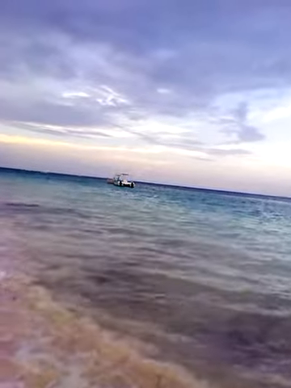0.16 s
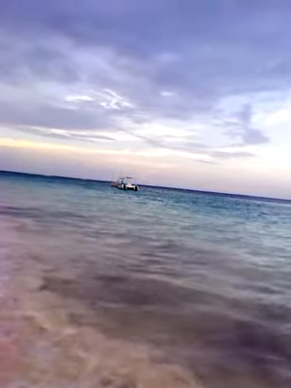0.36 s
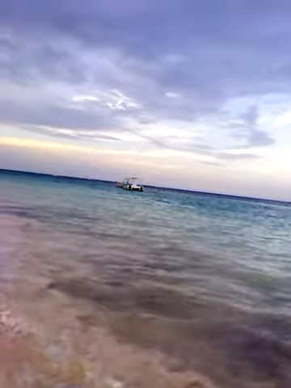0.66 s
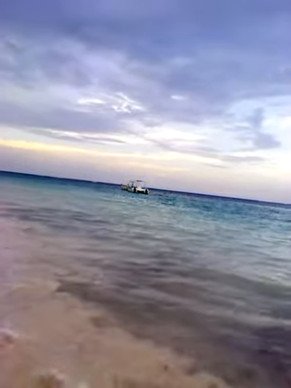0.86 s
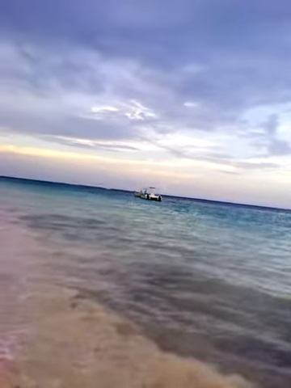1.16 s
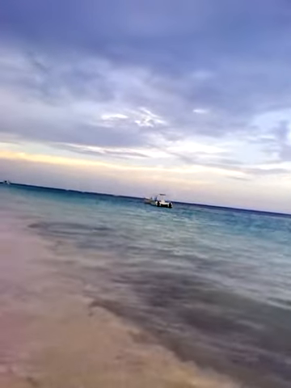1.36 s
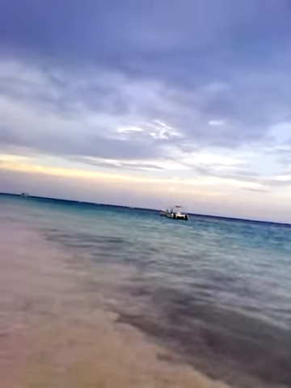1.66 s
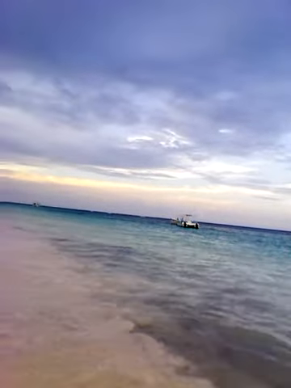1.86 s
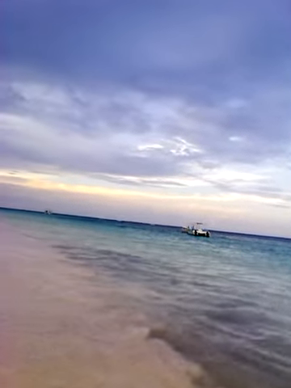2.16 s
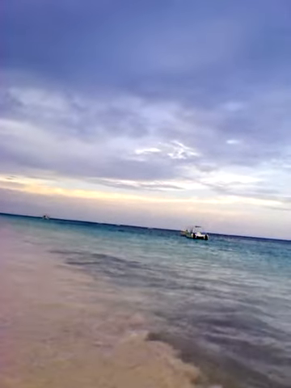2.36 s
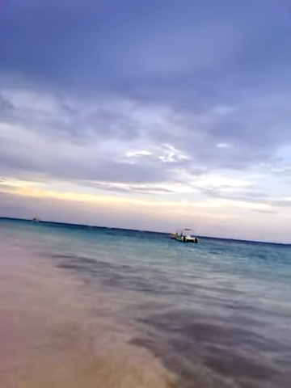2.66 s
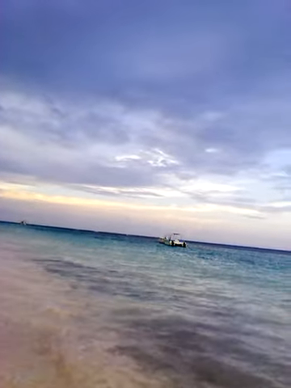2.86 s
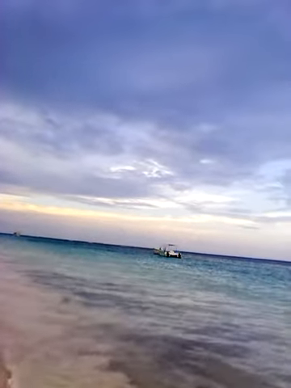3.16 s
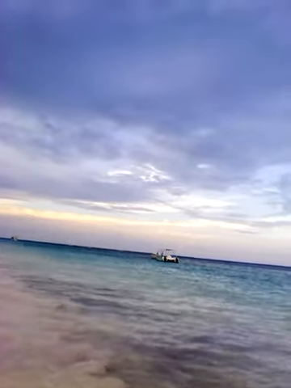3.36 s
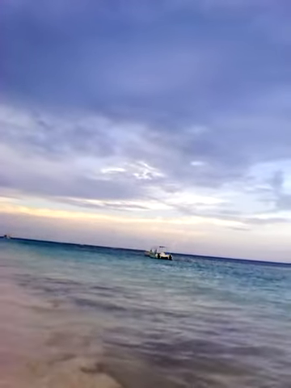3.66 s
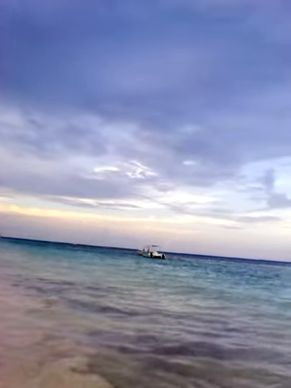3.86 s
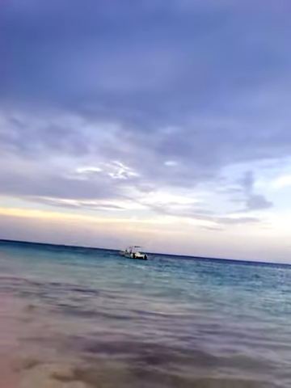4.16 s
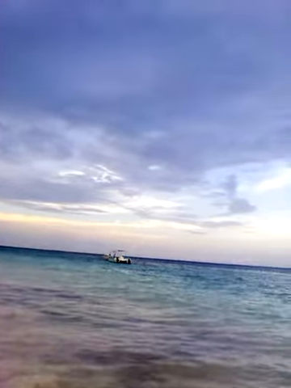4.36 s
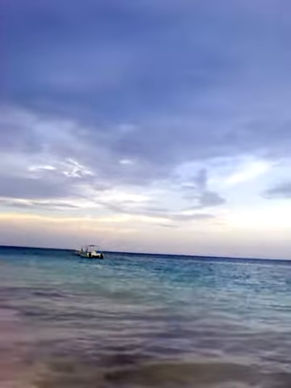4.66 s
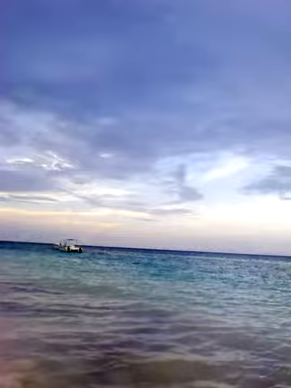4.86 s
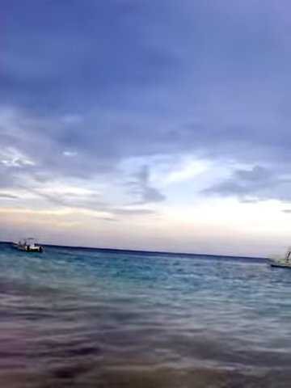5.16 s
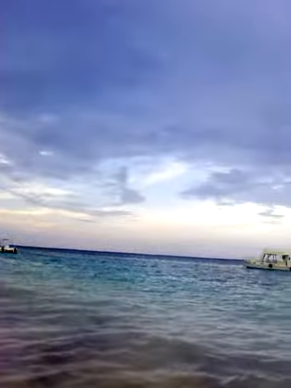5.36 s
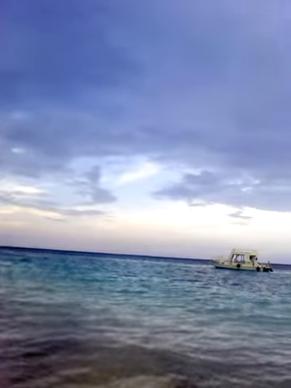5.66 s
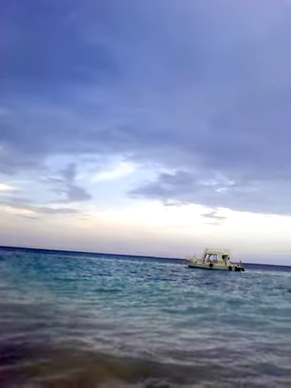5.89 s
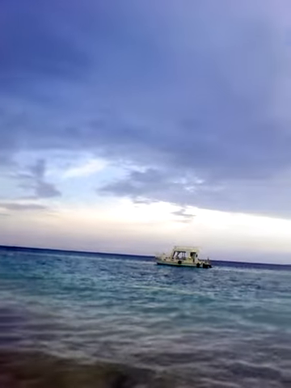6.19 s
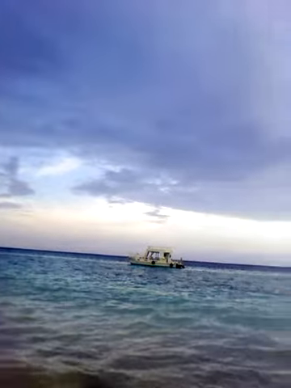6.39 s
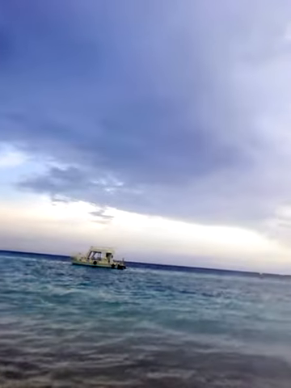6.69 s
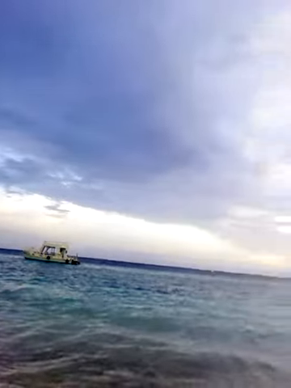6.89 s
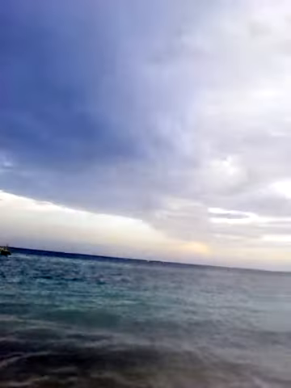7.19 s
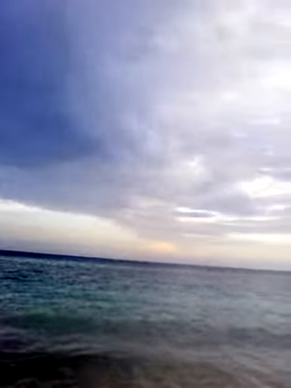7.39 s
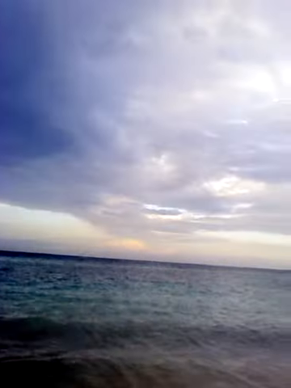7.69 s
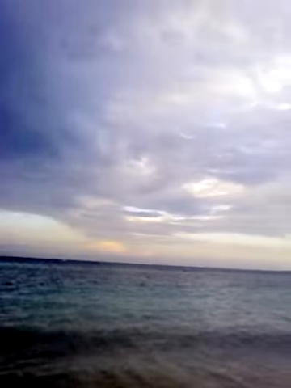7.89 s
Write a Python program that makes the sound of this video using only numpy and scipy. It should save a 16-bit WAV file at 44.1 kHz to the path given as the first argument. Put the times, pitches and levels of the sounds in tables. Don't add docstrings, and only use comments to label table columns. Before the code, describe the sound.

Foamy surf swells and hisses back over sand, fades under a hard buffeting gust, then returns as water slaps and soft wind puffs continue.

```python
import sys
import numpy as np
from scipy import signal
from scipy.fft import rfft, irfft, next_fast_len
from scipy.io import wavfile
from scipy.ndimage import uniform_filter1d

SR = 44100
rng = np.random.default_rng(int(sys.argv[2]) if len(sys.argv) > 2 else 0)


def magnitude_from_level(level_db):
    exponent = np.asarray(level_db, float) / 20
    return 10 ** exponent


def materialize(psi):
    bounded = np.clip(np.atleast_2d(psi).T, -1, 1)
    quanta = np.round(bounded * 32767).astype(np.int16)
    wavfile.write(sys.argv[1], SR, quanta)


N = 354563

# f/Hz, level/dB
WHINE = [(9367, -64.5)]
# f/Hz, level/dB
BUZZ = [(9300, -63), (12000, -58.5), (14900, -61)]
# t/s, level/dB, length/ms
PARTINGS = [
    (.475, -54, 35),
    (2.52, -32, 28),
    (3.545, -55, 35),
    (7.84, -28, 28),
]
# t/s, foam vigour/dB, big-bubble heft/dB, backwash pull/dB
SWASH = [(0, -33, 0, 0.5), (.65, -32.5, 1, -0.5), (1.4, -29, -1, 1), (1.8, -26.5, -1.5, 0),
         (2.05, -26, -2, -0.5), (2.3, -22, -4, -5), (2.6, -22, -0.5, -3), (2.87, -21.5, 2, 3),
         (3.3, -30.5, 2, 3.5), (3.8, -35, 4, 2.5), (4.25, -36.5, 2.5, 0), (4.6, -41, 0, -1.5),
         (5.3, -46.5, 1, 0.5), (5.95, -47.5, 4, 3), (6.02, -39.5, -0.5, 4), (6.4, -30.5, -1, 0.5),
         (7.2, -30, 0, 1), (8.04, -28, 0, -0.5)]
# t/s, lift/dB, length/ms
SPLASHES = [(.04, 5, 26), (.51, 3.5, 160), (1.07, 4, 110), (1.57, 3, 130), (1.72, 2, 50), (1.84, 3.5, 180),
            (2.44, 0, 77), (3.36, 8, 29), (3.83, 2, 50), (5.24, 1, 30), (5.92, 4, 60), (6.04, 2.5, 40),
            (6.115, 3, 30), (7.75, -1, 140), (.3, 2, 150), (6.22, 0, 60), (6.35, 2, 50), (7.1, 3.5, 130),
            (7.35, 2, 120)]
# t/s, change/dB, length/ms
CLOUDS = [
    (.7, -0.5, 150),
    (2.78, 0.5, 50),
    (4.05, 0, 220),
    (4.75, 0, 250),
    (6.1, -1.5, 200),
    (6.9, -1.5, 100),
]
# f/Hz, density/dB
ROAR_SPECTRUM = [(150, -19), (300, -3), (600, -2), (1200, -3.5), (1900, -8), (2600, -13), (4000, -23.5)]
WASH_SPECTRUM = [(1500, -16), (2300, 0), (3200, 2), (4200, 0), (5200, -15.5), (7000, -49.5)]
FIZZ_SPECTRUM = [(3500, -21), (4600, -2.5), (6000, 4), (7500, -3), (9000, -10.5), (11000, -17.5)]
SPRAY_SPECTRUM = [(7000, -4.5), (9000, -4), (11000, -7), (12300, -7.5), (13400, -12), (14400, -9),
                  (15500, -10), (17000, -2)]
# t/s, peak/dB
DROPS = [(0.8865, -27), (1.2077, -22), (1.2731, -25), (1.3943, -16), (1.7929, -21), (1.8348, -19),
         (2.1486, -20), (2.2254, -16), (2.5302, -19), (2.7677, -18), (2.8295, -21), (2.9308, -19),
         (3.2256, -24), (3.3504, -18), (3.6113, -28), (3.6616, -22), (3.957, -25), (6.025, -31),
         (6.3295, -19), (6.408, -23), (6.5576, -27), (6.6963, -24), (6.8335, -24), (6.8539, -20),
         (7.5309, -23)]
# t/s, level/dB, f/Hz, length/ms
SLAPS = [(6.647, -21, 950, 12), (6.683, -26, 960, 14), (2.918, -21, 1560, 16), (2.974, -22, 1350, 14),
         (3.236, -24, 1540, 16), (2.47, -24, 1050, 20), (2.87, -25, 1300, 20), (3.05, -25, 1300, 20),
         (7.3, -34, 880, 30), (3.759, -25, 820, 15), (6.778, -28, 710, 22), (2.9, -28, 1380, 200),
         (2.93, -27.5, 1800, 210)]
# t/s, level/dB, f/Hz, length/ms
GURGLES = [(5.42, -46, 3600, 180), (5.56, -47, 3400, 150), (6.04, -37, 850, 25), (5.91, -39, 5800, 10),
           (5.93, -39, 5800, 10), (5.96, -42, 5700, 10), (5.997, -40, 6000, 10), (6.73, -33, 800, 140),
           (3.375, -30, 5900, 40), (6.11, -36.5, 1300, 80), (3.15, -30, 1800, 220), (4.05, -42, 1900, 200),
           (2.68, -32, 1200, 120)]
# t/s, level/dB
BREEZE = [(0, -35), (.36, -36), (.55, -26), (.87, -38), (1.2, -29), (1.75, -31), (2.15, -39), (2.33, -37),
          (2.9, -32), (3.27, -43.5), (3.74, -32.5), (4.28, -31), (4.7, -21.5), (5.25, -28), (5.53, -32),
          (6.74, -28), (7.3, -31), (8.04, -26)]
# t/s, change/dB, length/ms
LULLS = [(.36, -6, 60), (.41, -8, 25), (.575, -8, 12), (.593, -8, 12), (.68, -5, 20), (4.43, -5, 15),
         (4.53, -5, 12), (4.742, -5, 15), (5.325, -4, 25), (6.03, -5, 40), (5.72, -6, 30), (.765, -13, 40),
         (.86, -6, 50), (1.3, -5, 70), (2.16, -9, 110), (2.65, -4, 100), (3.0, -4, 80), (3.28, -3, 100),
         (4.41, -10, 45), (4.6, -4, 20), (4.725, 1, 40), (4.895, 2, 40), (4.995, 3, 30), (5.055, 1.5, 40),
         (5.955, -4, 22), (6.2, -7, 50), (6.45, -3, 200), (6.85, -1, 140), (7.81, -10, 36)]
# t/s, peak/dB, length/ms
SWELLS = [(0, -29, 44), (.15, -37, 80), (.43, -26, 66), (.57, -36, 100), (.96, -25, 81), (1.19, -35, 81),
          (1.43, -36, 83), (1.75, -39, 200), (2.33, -38, 68), (3.74, -39, 150), (4.28, -39, 270),
          (4.47, -26, 120), (5.19, -26.5, 270), (5.4, -36, 100), (5.8, -44, 110), (3.12, -42, 120),
          (3.5, -39, 140), (7.23, -33, 160), (7.66, -35, 260), (7.95, -36, 150)]
# f/Hz, density/dB
EDDY_SPECTRUM = [(60, -30), (100, -3.5), (140, 4), (270, -2.5), (520, -13.5), (820, -35), (1300, -39),
                 (2500, -66)]
DEEP_SPECTRUM = [(15, -24), (30, -15), (50, -4), (80, -1.5), (110, -0.5), (160, -25)]
# t/s, f/Hz, level/dB
SHEDDING = [(5.4, 120, -30), (5.55, 119.8, -34.5), (5.82, 133.9, -25), (5.91, 132.8, -29.5),
            (5.97, 119, -33), (6.03, 121, -33), (6.07, 134, -33.5), (6.16, 139, -34.5), (6.3, 129.6, -33),
            (6.56, 133.5, -31), (6.72, 111.4, -30.5), (7.0, 105.5, -36)]
# t/s, change/dB
THROBS = [(5.4, 10), (5.63, 7), (5.765, 10), (5.924, 16), (6.03, -7), (6.08, 10), (6.15, 10), (6.2, -7),
          (6.26, 8), (6.31, 4), (5.49, 3), (5.67, 5), (5.705, -10), (5.83, 2), (5.985, 7), (6.116, -6),
          (6.46, 7), (6.485, -6), (6.535, 10), (6.61, -10), (6.67, -3), (6.74, 2), (6.8, 1.5), (6.88, -5),
          (6.914, 12.5)]
# t/s, peak/dB, f/Hz, length/ms
STRAYS = [(4.415, -22, 200, 12), (5.435, -19.5, 170, 18), (.44, -16.5, 330, 8), (.477, -17.5, 320, 10),
          (.862, -25.5, 480, 14), (.225, -25.5, 150, 20), (.72, -23, 110, 30), (.8, -22, 150, 20),
          (1.19, -23, 330, 25), (1.55, -29, 220, 30), (2.06, -25.5, 170, 28), (2.25, -30, 210, 50),
          (2.55, -32, 150, 40), (2.99, -30, 150, 27), (3.56, -26.5, 150, 35), (3.86, -29.5, 150, 55),
          (5.1, -22, 250, 14), (5.42, -27, 230, 36), (5.59, -28, 350, 14), (5.8, -25, 239, 60),
          (6.09, -23, 210, 26), (6.44, -26.5, 220, 72), (7.43, -24, 130, 25.6), (7.5, -23, 110, 30),
          (7.77, -25, 140, 40)]
# t/s, peak/dB, f/Hz
FLUTTERS = [(.03, -29, 213), (1.344, -23, 234), (1.594, -23, 251), (1.707, -24, 295), (1.741, -23.5, 199),
            (1.859, -22.5, 354), (3.519, -21, 212), (3.637, -20.5, 175), (3.68, -24, 330),
            (3.812, -25, 241), (4.02, -20.5, 253), (4.04, -25, 253), (4.089, -23, 220), (4.294, -20.5, 180),
            (4.34, -20.5, 241), (5.558, -23.5, 174), (5.599, -20, 198), (5.79, -27, 276), (6.311, -21, 171),
            (6.595, -24, 344.6), (6.625, -26, 320), (5.985, -25.5, 220), (7.059, -22, 205),
            (7.083, -23.5, 242), (7.175, -22, 217), (7.296, -23, 180), (7.544, -21, 264), (7.678, -20, 212),
            (7.749, -22, 198), (7.852, -28, 183), (7.924, -25, 240)]
# t/s, peak/dB, f/Hz, length/ms
PUFFS = [(0.0, -15, 122, 8.2), (0.119, -19, 232, 39), (0.296, -20.5, 236, 25), (.43, -16, 147, 19),
         (0.465, -12.5, 136, 9.6), (0.603, -21, 145, 12), (0.819, -18.5, 187, 9.2), (.908, -15, 188, 16),
         (1.046, -19, 232, 18), (1.219, -20.5, 233, 45), (1.426, -14, 251, 15), (1.648, -18.5, 248, 34),
         (1.803, -20.5, 200, 18), (1.955, -19.5, 213, 14), (3.356, -17, 205, 9.5), (3.716, -15.5, 270, 16),
         (3.981, -21, 203, 13), (4.176, -18, 222, 19), (4.266, -15, 214, 9.8), (4.379, -17, 238, 27),
         (5.398, -16, 130, 30), (5.671, -18.5, 180, 14), (5.93, -24.5, 300, 26), (6.118, -19.5, 245, 12),
         (7.223, -13, 262, 21), (7.34, -16, 241, 13), (7.387, -18, 209, 19), (7.643, -19.5, 255, 62),
         (7.997, -21.5, 220, 31), (8.033, -18, 280, 22)]
# t/s, peak/dB, f/Hz, length/ms
GUSTS = [(.524, -13, 210, 22), (.5375, -1.5, 230, 6.4), (.552, -6, 260, 13.5), (.5635, 3.5, 212, 11.3),
         (.584, -16, 250, 6.6), (.602, -18, 170, 10), (.616, -19, 300, 8), (.948, -18.5, 300, 10),
         (.983, -14.5, 300, 8), (4.725, -20, 258, 18), (4.778, -9, 298, 7.4), (4.888, -15, 180, 14),
         (4.906, -20, 220, 11), (4.947, -15, 180, 14), (4.992, -15, 230, 12), (5.045, -18, 160, 16),
         (5.063, -18, 200, 14), (5.1, -19, 300, 11), (5.18, -14, 180, 10), (5.208, -12, 160, 11),
         (5.268, -17, 190, 7.9), (5.367, -17, 180, 12), (.654, -13.5, 176, 24), (.7, -11, 255, 15),
         (.974, -14, 284, 26), (4.455, -15, 131, 24), (4.487, -15, 160, 54), (4.543, -10, 192, 16),
         (4.576, -15, 224, 20), (4.62, -16.5, 202, 20), (4.654, -9.5, 255, 16), (4.703, -14, 158, 23),
         (4.77, -6.5, 214, 25), (4.8, -16.5, 240, 27), (4.824, -10.5, 235, 9.6), (4.87, -15, 207, 32),
         (4.93, -13.5, 184, 35), (4.965, -16.5, 179, 24), (5.022, -10, 140, 13), (5.081, -18, 160, 10),
         (5.131, -12, 143, 11), (5.156, -11, 183, 25), (5.166, -7, 188, 19), (5.193, -4, 214, 15),
         (5.227, -8, 220, 6), (5.252, -2.5, 208, 12.5), (5.285, -7.5, 242, 9.3), (5.302, -8, 206, 14),
         (5.347, -14, 136, 13)]
# t/s, peak/dB
SNAPS = [(.534, -19), (.551, -12), (.564, -7), (.702, -14.5), (.971, -10), (1.195, -16.5), (3.714, -12.5),
         (4.016, -18), (4.503, -19), (4.545, -17.5), (4.655, -17.5), (4.776, -16), (4.827, -13),
         (5.162, -12), (5.238, -9), (5.252, -20), (5.283, -20), (5.292, -19), (5.302, -14.5),
         (5.384, -17.5), (7.224, -19), (8.003, -15)]
# t/s, peak/dB, f/Hz
CRACKS = [(5.197, -7.5, 940), (5.1975, -22, 1600), (5.206, -19, 640), (4.827, -24.5, 940),
          (5.598, -33, 800), (5.2381, -26, 3200), (5.238, -17, 2000), (5.2525, -30, 2400), (.566, -17, 950),
          (.559, -16, 910), (.923, -17, 630), (5.014, -24, 550), (5.667, -21, 500), (4.704, -18, 650),
          (4.547, -19, 650), (4.7745, -19, 900), (5.2535, -16, 850), (5.284, -21, 1000), (4.578, -22, 600),
          (4.992, -23, 700), (.984, -20, 800), (2.5, -28, 910)]

PORT_HZ, PORT_WIDTH_HZ, PORT_DB = 5900, 1970, 7
USUAL_VIGOUR_DB, USUAL_BREEZE_DB = -31, -32


def rms_one(x):
    return x / np.sqrt(np.mean(x ** 2) + 1e-20)


def in_time(rows):
    s, *columns = np.transpose(rows)
    return [np.interp(np.arange(N) / SR, s, c) for c in columns]


def drift(rate_hz):
    r = np.exp(-80 * np.pi * rate_hz / SR)
    slow = signal.lfilter([1], [1, -2 * r, r * r], rng.standard_normal(N // 40 + 2002))[2000:]
    return np.interp(np.arange(N) / 40, np.arange(len(slow)), rms_one(slow))


def add(out, sound, s):
    at = round(s * SR) - len(sound) // 2
    low, high = max(at, 0), min(at + len(sound), N)
    out[low:high] += sound[low - at:high - at]


def bells(rows):
    out, t = np.zeros(N), np.arange(-12000, 12000) / SR
    for s, height, ms in rows:
        add(out, height * np.exp(-.5 * (t / (0.33 * ms / 1000)) ** 2), s)
    return out


def sos_filter(order, hz, kind, x):
    return signal.sosfilt(signal.butter(order, hz, kind, fs=SR, output="sos"), x)


def port(x):
    r = np.exp(-np.pi * PORT_WIDTH_HZ / SR)
    poles = [1, -2 * r * np.cos(2 * np.pi * PORT_HZ / SR), r * r]
    peak = signal.lfilter([(1 - r * r) / 2, 0, (r * r - 1) / 2], poles, x)
    return x + (magnitude_from_level(PORT_DB) - 1) * peak


def patchy(source, spectrum, shared_db, own_db, rate_hz):
    size = next_fast_len(N)
    log_hz = np.log(np.maximum(np.arange(size // 2 + 1) * SR / size, 1))
    points = np.array(spectrum)
    knots = np.log(points[:, 0])
    coloured = rfft(source, size) * magnitude_from_level(np.interp(log_hz, knots, points[:, 1]))
    step = np.log(2) / 2
    out, together = 0, drift(rate_hz)
    for centre in np.arange(knots[0], knots[-1] + step, step):
        share = np.cos(np.pi / 2 * np.clip((log_hz - centre) / step, -1, 1)) ** 2
        flicker_db = shared_db * together + own_db * drift(rate_hz)
        out = out + irfft(coloured * share, size)[:N] * magnitude_from_level(flicker_db)
    return out


def burst(rows, below, above, high_order, low_order, cycles, peaky, swing=0):
    out, t = np.zeros(N), np.arange(-4500, 4500) / SR
    for (s, db, hz, ms), noise in zip(rows, rng.standard_normal((len(rows), len(t)))):
        plain = np.sqrt(2) * np.sin(2 * np.pi * (hz * t + noise[0]))
        noise = sos_filter(high_order, hz * below, "high", noise)
        noise = sos_filter(low_order, hz * above, "low", noise)
        noise = noise / np.sqrt(uniform_filter1d(noise ** 2, round(cycles * SR / hz)) + 1e-12)
        core = swing * np.exp(-.5 * (hz * t / 0.66) ** 2)
        noise = core * plain + np.sqrt(np.clip(1 - core ** 2, 0, 1)) * noise
        noise = noise * (np.abs(noise) + 0.44) ** peaky
        bell = np.exp(-.5 * (t / (0.34 * ms / 1000)) ** 2)
        add(out, magnitude_from_level(db - 3.5) * bell * noise, s)
    return out


def electronics():
    t = np.arange(N) / SR
    whine = sum(np.sqrt(2) * magnitude_from_level(db) * np.sin(2 * np.pi * hz * t) for hz, db in WHINE)
    buzz_per_s, first_s = 10.0, .085
    throb = (.5 + .5 * np.cos(2 * np.pi * buzz_per_s * (t - first_s))) ** 1.5
    white = rng.standard_normal(N)
    buzz = 0
    for hz, db in BUZZ:
        buzz = buzz + magnitude_from_level(db) * rms_one(sos_filter(2, [hz - 450, hz + 450], "band", white))
    return whine + throb * buzz


def parting():
    hiss = port(sos_filter(4, [5700., 9600.], "band", rng.standard_normal(N)))
    return rms_one(hiss) * bells([(s, magnitude_from_level(db - 7.0), ms) for s, db, ms in PARTINGS]) * [[1], [-1]]


def gurgles():
    return burst(GURGLES, below=.9, above=1.1, high_order=6, low_order=6, cycles=40., peaky=0)


def slaps():
    return burst(SLAPS, below=.95, above=1.05, high_order=8, low_order=8, cycles=20., peaky=0)


def drops():
    out, t = np.zeros(N), np.arange(-500, 500) / SR
    decay_s = 0.0023
    for (s, db), noise in zip(DROPS, rng.standard_normal((len(DROPS), len(t)))):
        add(out, magnitude_from_level(db - 5.5) * noise * (t >= 0) * np.exp(-np.abs(t) / decay_s), s)
    return port(sos_filter(1, [4000., 11000.], "band", out))


def bursting(per_s, spread_db, share):
    sizes_db = spread_db * np.minimum(rng.exponential(1, N), 3.6)
    sizes = magnitude_from_level(sizes_db) * rng.choice([-1, 1], N)
    born = rng.random(N) < per_s / SR
    return share * rms_one(sizes * born) + rng.standard_normal(N)


def surf():
    vigour_db, heft_db, pull_db = in_time(SWASH)
    heft_db = heft_db + bells(CLOUDS)
    splash_db = bells(SPLASHES)
    swing_db = vigour_db - USUAL_VIGOUR_DB
    bubbles = bursting(per_s=400., spread_db=3.5, share=0.53)
    foam = bursting(per_s=2500., spread_db=4.5, share=0.56)
    roar = patchy(bubbles, ROAR_SPECTRUM, shared_db=0.7, own_db=0.65, rate_hz=24.0)
    wash = patchy(foam, WASH_SPECTRUM, shared_db=1.07, own_db=1.23, rate_hz=30.0)
    fizz = patchy(foam, FIZZ_SPECTRUM, shared_db=0.5, own_db=1.02, rate_hz=63.0)
    spray = patchy(foam, SPRAY_SPECTRUM, shared_db=1.5, own_db=0.5, rate_hz=27.0)
    roar_db = -33.4 + swing_db + 0.93 * heft_db + 0.15 * splash_db
    wash_db = -39.5 + 0.98 * swing_db + 0.87 * pull_db + 0.7 * splash_db
    fizz_db = -32 + swing_db + 0.01 * heft_db + 0.54 * splash_db
    spray_db = -50 + swing_db + 0.05 * pull_db + 0.6 * splash_db
    out = magnitude_from_level(-50) * rms_one(port(spray))
    for db, layer in [(roar_db, roar), (wash_db, wash), (fizz_db, fizz), (spray_db, spray)]:
        out = out + magnitude_from_level(db) * rms_one(port(layer))
    return out


def shedding():
    hz, db = in_time(SHEDDING)
    t = np.arange(N) / SR
    fade_in = np.clip((t - SHEDDING[0][0]) / 0.037, 0, 1)
    fade_out = np.clip((SHEDDING[-1][0] - t) / 0.042, 0, 1)
    phase = 2 * np.pi * np.cumsum(hz * (1 + 0.045 * drift(18.2))) / SR
    throb_ms = 28
    throb_db = bells([(s, lift_db, throb_ms) for s, lift_db in THROBS])
    level = np.sqrt(2) * fade_in * fade_out * magnitude_from_level(db + throb_db + 1.5 * drift(16.0))
    return level * (np.sin(phase) + 0.1 * np.sin(2 * phase))


def steady_wind():
    breeze_db, = in_time(BREEZE)
    wake_db, wake_ms = -20, 50
    wake_power = bells([(s, magnitude_from_level(db + wake_db) ** 2, wake_ms) for s, db, hz, ms in GUSTS + PUFFS])
    swell_power = bells([(s, magnitude_from_level(db) ** 2, ms) for s, db, ms in SWELLS])
    deep_db = -45.5 + 0.61 * (breeze_db - USUAL_BREEZE_DB)
    rumble = patchy(rng.standard_normal(N), EDDY_SPECTRUM, shared_db=3.0, own_db=1.0, rate_hz=36.0)
    deep = patchy(rng.standard_normal(N), DEEP_SPECTRUM, shared_db=2.5, own_db=1.5, rate_hz=9.1)
    rumble = np.sqrt(magnitude_from_level(breeze_db - 2.0) ** 2 + wake_power) * rms_one(rumble)
    deep = np.sqrt(magnitude_from_level(deep_db) ** 2 + swell_power) * rms_one(deep)
    return magnitude_from_level(bells(LULLS)) * (rumble + deep)


def strays():
    return burst(STRAYS, below=0.57, above=1.3, high_order=2, low_order=4, cycles=2.24,
                 peaky=0.28, swing=0.75)


def puffs():
    flutter_ms = 19.5
    rows = GUSTS + PUFFS + [row + (flutter_ms,) for row in FLUTTERS]
    pressure = burst(rows, below=0.49, above=1.38, high_order=2, low_order=4, cycles=2.24,
                     peaky=0.4, swing=0.88)
    return sos_filter(2, 85., "high", pressure)


def snapped(flow):
    out, calm, t = np.zeros(N), np.ones(N), np.arange(-600, 600) / SR
    snaps = [(s, db, 690 + 12 * db) for s, db in SNAPS]
    for s, db, hz in snaps + CRACKS:
        u = (np.pi * hz * .85 * t) ** 2
        add(out, -magnitude_from_level(db + 4.0) * (1 - 2 * u) * np.exp(-u), s)
        add(calm, -.6 * np.exp(-u / 6), s)
    return flow * np.clip(calm, 0, 1) + out


def wind():
    return snapped(steady_wind() + puffs()) + shedding() + strays()


def scene():
    water = gurgles() + slaps() + drops() + surf()
    return electronics() + water + wind() + parting()


def overload(pressure):
    ceiling, knee = .7, 12.
    return pressure / (1 + np.abs(pressure / ceiling) ** knee) ** (1 / knee)


def band_limit(x):
    return signal.sosfilt(signal.butter(12, 15700, fs=SR, output="sos"), x)


def record(dry):
    held = overload(dry)
    return band_limit(held)


dry = scene()
out = record(dry)
materialize(out)
```